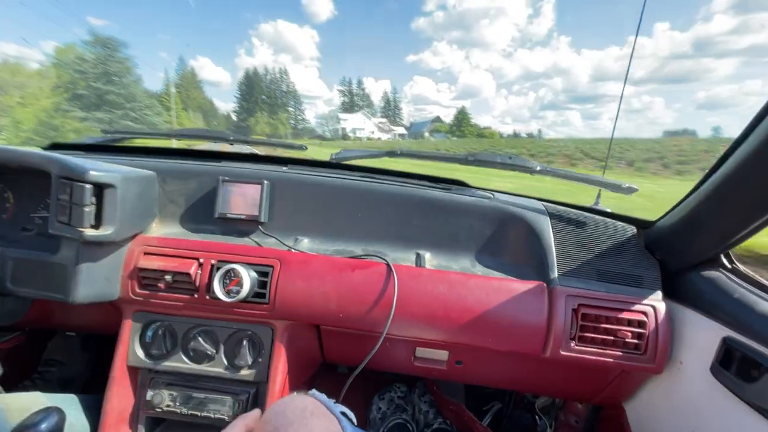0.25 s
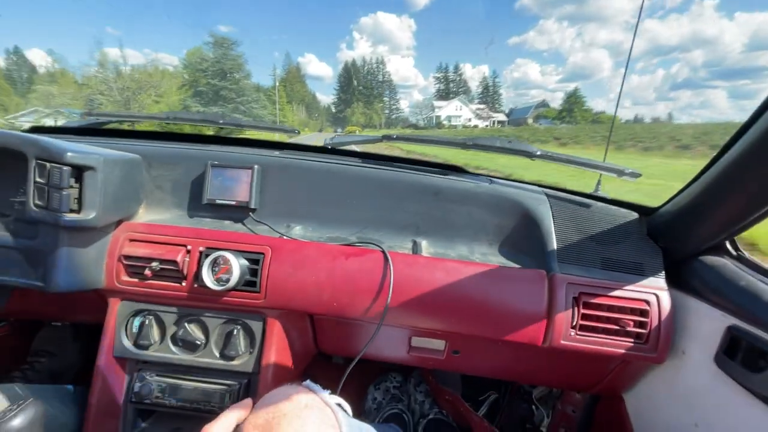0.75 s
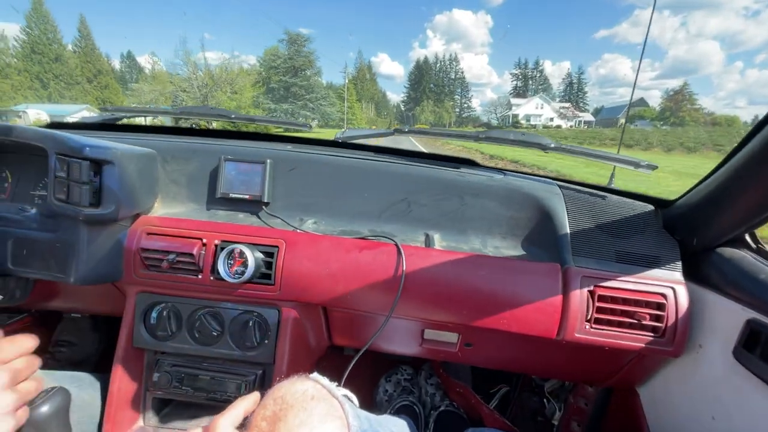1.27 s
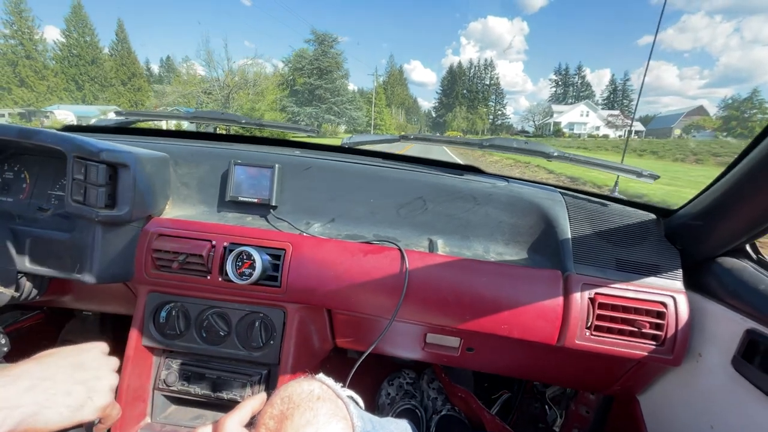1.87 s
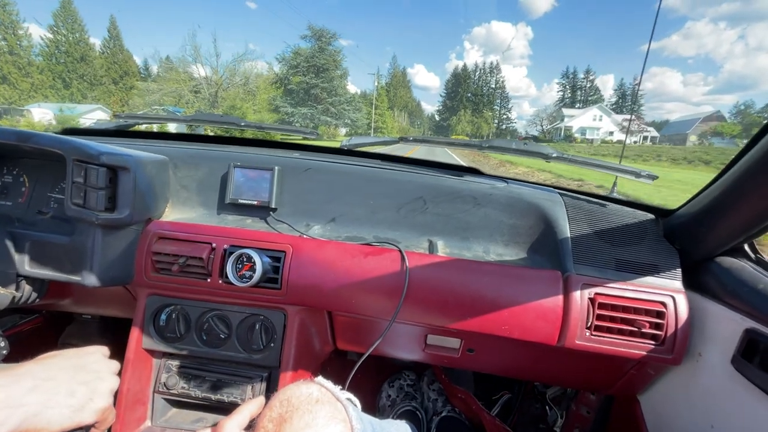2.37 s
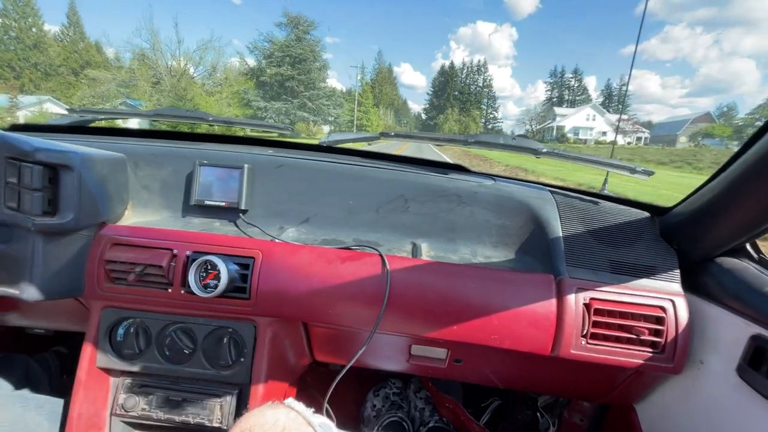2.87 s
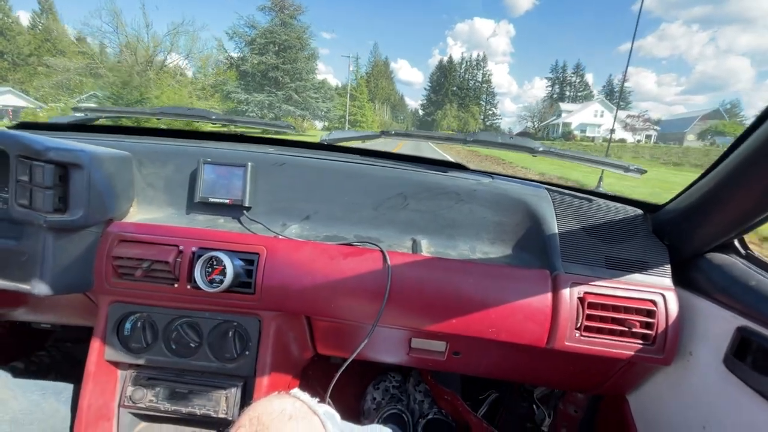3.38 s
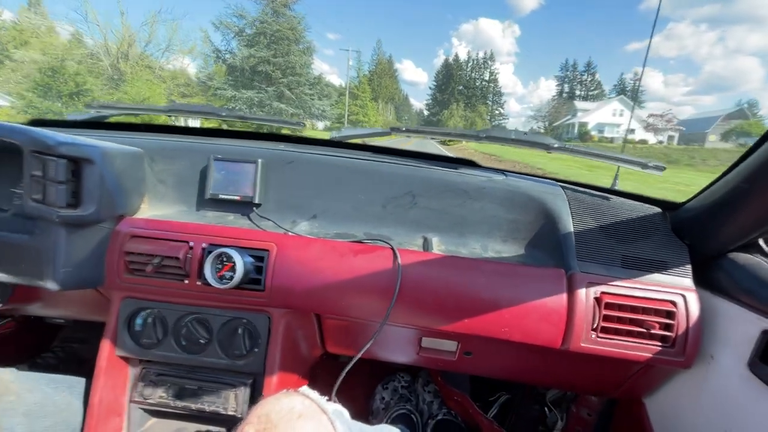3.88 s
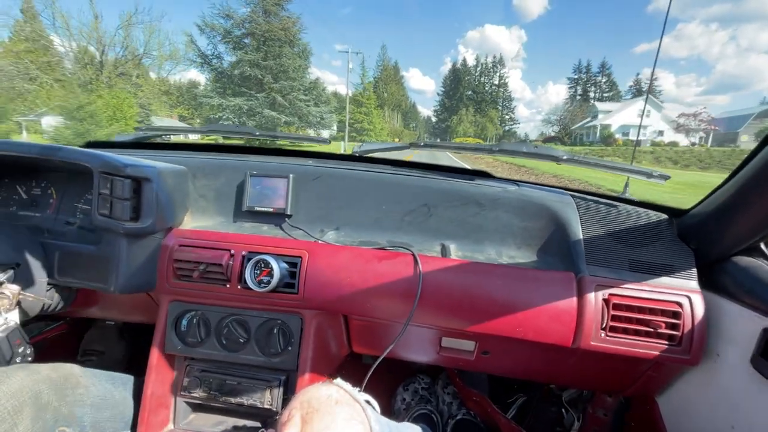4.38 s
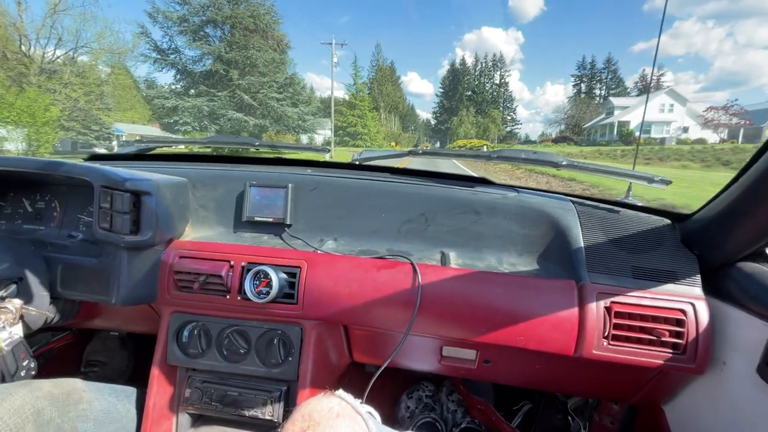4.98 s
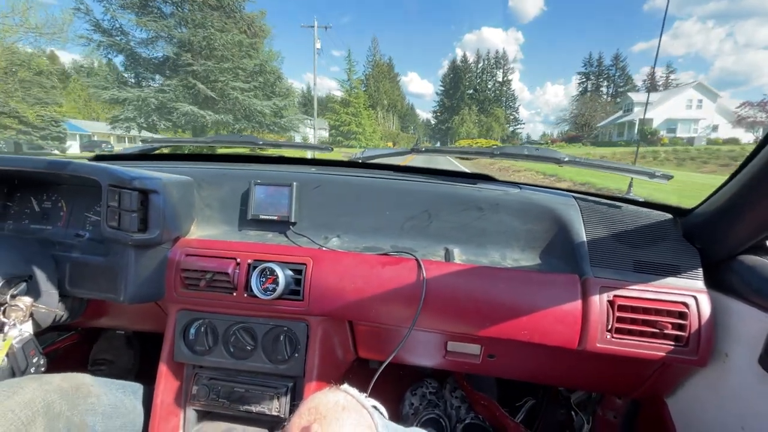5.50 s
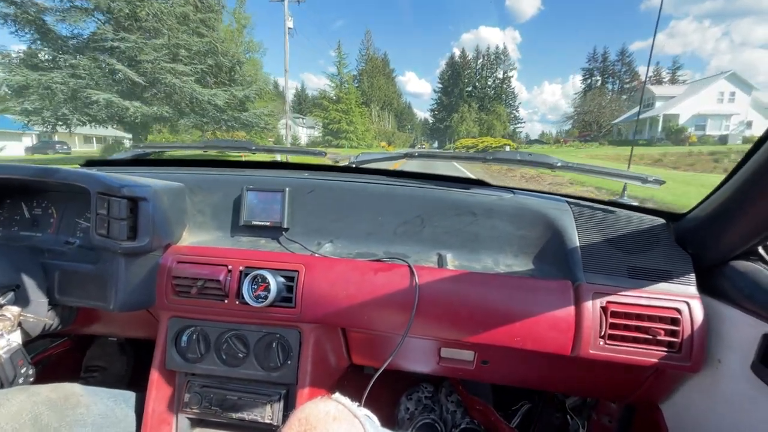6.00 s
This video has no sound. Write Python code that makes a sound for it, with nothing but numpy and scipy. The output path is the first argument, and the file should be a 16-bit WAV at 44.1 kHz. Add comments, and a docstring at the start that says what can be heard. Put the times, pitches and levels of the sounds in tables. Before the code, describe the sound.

A V8 heard from the passenger seat surges through one gear, slightly shuddering at first, with booming exhaust, breathy intake hiss and a thin supercharger whine. One small clink rings on the left near the start. After about two and a half seconds it falls back for a shift, rumbling and burbling, then drives upward again to the end, with a swell of air. Close, bassy cabin sound.

```python
"""A supercharged V8 pulls hard, changes up and pulls again, heard from the passenger seat.
The exhaust is a sum of orders of the cycle rate that sweep through the cabin booms, with burbles near the shift.
The blower whines at a fixed multiple of engine speed; shaped noise makes roar, intake rush, hiss and rumble.
A small piece of metal clinks once in the first pull, and a gust of air swells in the second."""
import sys
import numpy as np
from scipy import signal
from scipy.fft import rfft, irfft
from scipy.io import wavfile
from scipy.ndimage import uniform_filter1d, minimum_filter1d

SR = 44100
rng = np.random.default_rng(int(sys.argv[2]) if len(sys.argv) > 2 else 0)


def materialize(psi):
    """Save the field psi as 16-bit PCM at rate SR to the path in sys.argv[1].

    A 1-D psi becomes a single channel; in a 2-D psi each row is a channel.
    """
    bounded = np.clip(np.atleast_2d(psi).T, -1, 1)
    quanta = np.round(bounded * 32767).astype(np.int16)
    wavfile.write(sys.argv[1], SR, quanta)


N = 275625
TIME = np.arange(N) / SR  # s

# phase by which the left channel leads the right: frequency_hz, lead_rad
LEFT_LEAD = [(0, 0), (600, -2.6), (1290, -3.2), (1550, -0.6), (1980, -3.0), (2330, -0.7), (2930, -3.6),
             (3790, -5.8), (4480, -6.2), (5430, -10.1), (5860, -8.3), (6200, -11.9), (7060, -13.2),
             (8440, -11.2), (9730, -15.6), (10900, -16.2), (11700, -18.8), (12600, -18.9)]

# Engine speed is counted in four-stroke cycles per s: two crank turns, eight firings.
CRUISE_SPEED = 19  # reference for the levels that rise with speed, cycles per s
BLOWER_ORDER = 297.5  # whine cycles per engine cycle
# The foot lifts, the clutch bites, the throttle opens again; CLOSE_S is how long the throttle takes to shut.
LIFT_S, BITE_S, REOPEN_S, CLOSE_S = 2.576, 3.149, 3.187, 0.075


def from_db(db):
    """Amplitude ratio is ten to the power of decibels over twenty."""
    return 10 ** (np.asarray(db) / 20)


def rms_one(x):
    """Dividing by the root mean square gives unit power."""
    return x / np.sqrt(np.mean(x ** 2) + 1e-20)


def at_log(rows, position):
    """Interpolation on a logarithmic axis: each column after the first is read at the position."""
    points, *columns = np.transpose(rows)
    where = np.log(position + 1)
    return [np.interp(where, np.log(points + 1), column) for column in columns]


def drift(rate_hz):
    """Low-passed noise is a slow random fluctuation, here of spread 1."""
    step = 40  # samples between the points of the slow noise
    pole = np.exp(-2 * step * np.pi * rate_hz / SR)
    white = rng.standard_normal(N // step + 2002)
    slow = signal.lfilter([1], [1, -2 * pole, pole * pole], white)[2000:]  # start-up dropped
    return np.interp(np.arange(N) / step, np.arange(len(slow)), rms_one(slow))


def ramp(start_s, length_s):
    """Linear transition from 0 to 1."""
    return np.clip((TIME - start_s) / length_s, 0, 1)


def swell(centre_s, length_s):
    """Gaussian envelope of height 1; length_s is the half-width at 1/e."""
    return np.exp(-((TIME - centre_s) / length_s) ** 2)


def pan(tilt_db):
    """Constant-power panning: left and right gains that differ by tilt_db."""
    gains = from_db(np.array([[.5], [-.5]]) * tilt_db)
    return gains / np.sqrt(np.mean(gains ** 2, axis=0))


def stereo_tone(phase, tilt_db, lead_rad):
    """Level and phase differences place a sine of rms 1 between left and right."""
    return np.sqrt(2) * pan(tilt_db) * np.cos(phase + np.array([[.5], [-.5]]) * lead_rad)


def ring(clicks, hz, t60_s):
    """A lightly damped resonator: a unit click starts a decaying sine of height 1."""
    radius, turn = from_db(-60 / (t60_s * SR)), 2 * np.pi * hz / SR
    denominator = [1, -2 * radius * np.cos(turn), radius * radius]
    return signal.lfilter([0, np.sin(turn)], denominator, clicks + 1e-18)


def cabin_noise(colour):
    """Spectral shaping: white noise takes on a colour, with partial stereo coherence and rms 1."""
    # peaks and dips in the noise colour: frequency_hz, width_hz, level_db (added to the colour; negative is a dip)
    peaks_and_dips = [(783, 71, -5.5), (1530, 42, 6.5), (1800, 414, 9), (2730, 110, 4), (3020, 150, 7.5),
                      (4280, 17, 11), (4250, 38, 1.5), (4940, 47, 1), (5940, 600, 6.5), (8850, 580, 3.5),
                      (10480, 190, -9.5)]
    # correlation of left and right: frequency_hz, likeness (0 to 1)
    likeness = [(60, .98), (250, .8), (500, .75), (1000, .45), (2000, .55), (4500, .7), (8500, .8),
                (12000, .95)]
    # left level above right: frequency_hz, tilt_db
    tilt = [(60, 0.5), (90, -1.0), (140, 1.0), (210, -2.5), (310, -2.5), (470, 0.0), (700, -2.0),
            (1060, 0.5), (1600, 0.5), (2410, -1.0), (3630, 3.0), (5460, 4.5), (8230, -1.5), (12400, 0.5)]
    hz = np.arange(N // 2 + 1) * SR / N
    level_db = at_log(colour, hz)[0]
    for centre_hz, width_hz, change_db in peaks_and_dips:
        level_db = level_db + change_db / (1 + (2 * (hz - centre_hz) / width_hz) ** 2)
    alike = np.clip(at_log(likeness, hz)[0], 0, .99)
    mid, side = rfft(rng.standard_normal((2, N)))
    channels = np.sqrt(1 + alike) * mid + np.sqrt(1 - alike) * side * [[1], [-1]]
    lead_rad = np.interp(hz, *np.transpose(LEFT_LEAD))
    delay = np.exp(1j * lead_rad * [[.5], [-.5]])
    spectrum = channels * delay * pan(at_log(tilt, hz)[0]) * from_db(level_db)
    return rms_one(irfft(spectrum, N))


def shudder():
    """Torsional oscillation: engine speed swings while the driveline winds up and lets go."""
    # start_s, length_s, swing_hz, depth (cycles per s)
    shudders = [(0, 1.14, 2.52, .39), (3.27, .3, 3.1, .22), (3.578, .24, 2.06, .75)]
    swing = 0
    for start_s, length_s, hz, depth in shudders:
        age = np.maximum(TIME - start_s, 0)
        swing = swing + depth * np.sin(2 * np.pi * hz * age) * np.exp(-(age / length_s) ** 4)
    return swing


def engine_speed():
    """Drag flattens each pull; between them the revs fall freely, then the clutch drags them to the next gear."""
    # pull in each gear: start_s, start_speed (cycles per s), gain (cycles per s, each s)
    pulls = [(0, 14.535, 4.128), (3.626, 14.324, 2.737)]
    drag_per_s = .049  # share of the mean acceleration lost each s
    bite_speed = 15.963  # cycles per s, before the shudders
    first, second = (start_speed + gain * (TIME - start_s) * (1 - drag_per_s * (TIME - start_s))
                     for start_s, start_speed, gain in pulls)
    locked_s, locked_speed, _ = pulls[1]
    lift_speed = np.interp(LIFT_S, TIME, first)
    shift = np.interp(TIME, [LIFT_S, BITE_S, locked_s], [lift_speed, bite_speed, locked_speed])
    return np.select([TIME < LIFT_S, TIME < locked_s], [first, shift], second) + shudder()


def throttle_shut():
    """Throttling of the charge: 1 while the throttle is shut, 0 at full throttle."""
    return ramp(LIFT_S, CLOSE_S) - ramp(REOPEN_S, length_s=0.29)


def boost_lost():
    """Exponential relaxation: pressure bleeds away after the lift and builds once the throttle opens (0 to 1)."""
    fall_s, rise_s = 0.031, 0.47  # time constants
    bled = 1 - np.exp(-np.maximum(TIME - LIFT_S, 0) / fall_s)
    return bled * np.exp(-np.maximum(TIME - REOPEN_S, 0) / rise_s)


def pulsing(angle, per_turn, per_firing, ragged_db):
    """Amplitude modulation: gas noise swells with each crank turn and each firing."""
    pulses = np.exp(per_turn * np.cos(2 * angle) + per_firing * np.cos(8 * angle))
    return rms_one(pulses * from_db(ragged_db * drift(33)))


def flow_level(speed, cruise_db, rise_db, shut_db):
    """Flow noise grows with speed by rise_db per doubling and changes by shut_db without boost."""
    return from_db(cruise_db + rise_db * np.log2(speed / CRUISE_SPEED) + shut_db * boost_lost())


def body_rumble(speed):
    """Structure-borne noise grows with speed and swells as the body judders while the clutch takes up."""
    # frequency_hz, level_db (relative, per Hz)
    rumble_colour = [(15, -26), (30, -9), (50, 10), (75, 8), (100, 7.5), (140, 7.5), (220, 2), (300, -13.5),
                     (500, -51)]
    judder_db = 17.5 * swell(3.25, length_s=0.39)
    level = from_db(-28 + 20.5 * np.log2(speed / CRUISE_SPEED) + judder_db)
    return level * cabin_noise(rumble_colour)


def hiss(speed, angle):
    """Turbulent flow noise at the top of the spectrum, steeply dependent on speed."""
    # frequency_hz, level_db (relative, per Hz)
    hiss_colour = [(4000, -12.5), (6000, -3.5), (7500, -3), (8900, -0.5), (10500, 3.5), (11500, -4),
                   (12500, -24), (13500, -38)]
    level = flow_level(speed, cruise_db=-44, rise_db=19, shut_db=-11)
    return level * pulsing(angle, per_turn=.03, per_firing=.06, ragged_db=0.76) * cabin_noise(hiss_colour)


def intake_rush(speed, angle):
    """Turbulent flow noise of the intake air, pulsed by the engine."""
    # frequency_hz, level_db (relative, per Hz)
    intake_colour = [(700, -5.5), (1200, -1), (1700, -3), (2300, -3), (3200, -1), (3900, -8), (4500, -3.5),
                     (5500, -3.5), (6500, -17.5), (8000, -51)]
    level = flow_level(speed, cruise_db=-37, rise_db=12, shut_db=-8.5)
    return level * pulsing(angle, per_turn=0.031, per_firing=0.076, ragged_db=0.65) * cabin_noise(intake_colour)


def exhaust_roar(speed, angle):
    """Turbulent flow noise of the exhaust gas, pulsed by the engine."""
    # frequency_hz, level_db (relative, per Hz)
    roar_colour = [(120, -36.5), (250, 1), (400, 0), (540, -3), (700, -2), (1000, -6.5), (1250, -17.5),
                   (2000, -43)]
    level = flow_level(speed, cruise_db=-28, rise_db=10.5, shut_db=-9.5)
    return level * pulsing(angle, per_turn=0.041, per_firing=0.061, ragged_db=1.56) * cabin_noise(roar_colour)


def gust():
    """Turbulent noise under a Gaussian envelope: a rush of air swells and fades during the second pull."""
    # frequency_hz, level_db (relative, per Hz)
    gust_colour = [(900, -33), (1500, -13), (2000, -3), (2500, -3), (3200, -13.5), (4200, -20.5)]
    return from_db(-36.5) * swell(5.0, length_s=0.23) * cabin_noise(gust_colour)


def clink(start_s=0.31, hz=6654, tap_db=-29):
    """Impulse response of one damped mode: loose metal is tapped once as the car surges."""
    tap = np.zeros(N)
    tap[round(start_s * SR)] = from_db(tap_db)
    return ring(tap, hz, t60_s=.13) * pan(tilt_db=14)


def whine_db(speed):
    """Duct resonance: the whine sweeps through peaks, follows the belt's tug and sinks with the bypass open."""
    # whine on full boost as the duct passes it: frequency_hz, level_db (rms, before tug, bypass and flicker)
    whine_duct = [(4300, -52.5), (4750, -48), (5130, -47), (5480, -40.5), (5850, -49), (6200, -42.5),
                  (6700, -43), (7050, -51.5)]
    bypass_open = ramp(LIFT_S, CLOSE_S) - ramp(BITE_S, length_s=.03)
    tug_limit = 4.5  # cycles per s squared; the belt slips above this
    tug = np.clip(np.gradient(shudder()) * SR, -tug_limit, tug_limit)
    tug_db = 1.3 * uniform_filter1d(tug, size=3000)
    return at_log(whine_duct, BLOWER_ORDER * speed)[0] + tug_db - 18 * bypass_open


def blower(speed, angle, flutter=0.001, flicker_db=2.5, tilt_db=8):
    """Blade-passing tone locked to engine speed; at low revs random modulation frays it into a band."""
    lugging = np.clip((17 - speed) / 2, .05, .75)  # share of the tone's power that is frayed
    slip = (flutter + .008 * lugging) * drift(18)  # fraction of engine speed
    phase = BLOWER_ORDER * (angle + 2 * np.pi * np.cumsum(speed * slip) / SR)
    fray = np.sqrt(1 - lugging) + np.sqrt(lugging / 2) * (drift(110) + 1j * drift(110))
    lead_rad = np.interp(BLOWER_ORDER * speed, *np.transpose(LEFT_LEAD))
    level = from_db(whine_db(speed) + flicker_db * drift(36))
    return level * np.abs(fray) * stereo_tone(phase + np.angle(fray), tilt_db, lead_rad)


def burbles():
    """Transient excitation: late burns in the pipes make the cabin boom softly for a few cycles."""
    # centre_s, pitch_hz, peak_db
    bursts = [(2.655, 50, -16), (3.04, 52, -20), (3.21, 64, -15), (3.27, 68, -14), (3.335, 56, -16),
              (3.61, 54, -22)]
    return sum(from_db(peak_db) * swell(centre_s, length_s=.028) * np.cos(2 * np.pi * hz * (TIME - centre_s))
               for centre_s, hz, peak_db in bursts)


def exhaust(speed, angle, waver_hz=7, waver_growth=0.091, scatter_rad=0.296):
    """Harmonic synthesis: eight firings a cycle give the main note, unequal cylinders the other orders."""
    # exhaust lines: order (multiple of the cycle rate), level_db (before boom, load and rasp)
    orders = [(2, 9), (3, -7), (4, -7.5), (5, -10), (6, -1.5), (7, -15), (8, 5), (9, -17), (10, -8.5),
              (11, -15), (12, -19), (13, -20), (14, -24), (15, -16), (16, -15), (17, -27.5), (18, -22),
              (19, -21), (20, -23), (21, -32.5), (22, -24), (23, -36), (24, -30.5), (25, -32.5), (26, -43),
              (27, -46.5), (28, -43.5), (29, -29), (30, -24.5), (31, -28), (32, -50), (33, -36.5),
              (34, -30), (35, -54), (36, -44.5)]
    # cabin booms at the passenger seat: frequency_hz, boom_db
    cabin_booms = [(35, -47.5), (44, -27.5), (64, -16.5), (100, -19.5), (122, -12), (148, -13.5),
                   (168, -15.5), (210, 1), (250, -7), (292, -27), (330, -4.5), (380, -9.5), (420, -15),
                   (545, -2.5), (800, -44)]
    # standing waves, left against right: frequency_hz, tilt_db, lead_rad
    cabin_stereo = [(45, 0, 0), (70, 1, -.1), (100, 0, -.6), (125, -1, -.45), (148, 1, -.4), (168, 7, .4),
                    (188, -5, .7), (210, -13, -.5), (245, -8, -.5), (290, -1, -.3), (335, 1, -1.1),
                    (545, -2, -2.3)]
    # strength at full throttle: speed (cycles per s), firing_db, throb_db (of the unequal cylinders)
    torque = [(13.87, -5, -8.5), (17.65, 2.5, -5.5), (20, 2.5, 0.5), (20.73, -0.5, -1), (22.63, -2.5, -1),
              (23.4, -6, -1)]
    unsteady = 0.14  # variation from cycle to cycle, scaled by waver_growth and order
    growl_speed, align_rad = 20.0, .055  # cycles per s; rad per cycle per s
    firing_db, throb_db = at_log(torque, speed)
    shut = throttle_shut()
    firing_db, throb_db = firing_db - 10 * shut, throb_db - 15 * shut
    out = np.zeros((2, N))
    for order, level_db in orders:
        boom_db, = at_log(cabin_booms, order * speed)
        tilt_db, lead_rad = at_log(cabin_stereo, order * speed)
        if order < 5:
            load_db = 0  # shaking of the block, which goes on with the throttle shut
        elif order % 8:
            load_db = throb_db
        else:
            load_db = firing_db
        rasp_db = 6.5 * np.log2(speed / CRUISE_SPEED) if order > 12 else 0
        # combustion varies from cycle to cycle, the more so in the high orders
        waver = unsteady * waver_growth * order
        # reflections in pipes and cabin smear and scatter the orders far from the firing note
        away = abs(order - 8)
        scatter = scatter_rad * max(away - 3, 0) * rng.standard_normal()
        # rising revs draw the echoes into line, so that the throb hardens into a growl
        align = align_rad * (speed - growl_speed) * min(away, 2) ** 2
        phase = order * angle + .2 * away ** 2 - align + scatter + waver * drift(waver_hz)
        level = from_db(level_db + boom_db + load_db + rasp_db) * (1 + waver * drift(waver_hz))
        out += level * stereo_tone(phase, tilt_db, lead_rad)
    return out


def scene():
    """Superposition: the crank angle, the integral of engine speed, drives exhaust, blower and gas noise."""
    speed = engine_speed()
    angle = np.pi + 2 * np.pi * np.cumsum(speed) / SR  # rad, one turn of it per four-stroke cycle
    engine = exhaust(speed, angle) + burbles() + blower(speed, angle)
    gas = exhaust_roar(speed, angle) + intake_rush(speed, angle) + hiss(speed, angle)
    return engine + gas + body_rumble(speed) + gust() + clink()


def record(dry):
    """Gain control and band limiting: a look-ahead limiter holds the peaks, a steep low-pass cuts the top."""
    ceiling, hold = .77, round(.025 * SR)  # full scale 1; samples
    room = ceiling / np.maximum(np.abs(dry).max(axis=0), ceiling)
    gain = uniform_filter1d(minimum_filter1d(room, 2 * hold), hold)
    low_pass = signal.ellip(10, .1, 90, 12300, fs=SR, output="sos")  # ripple dB, stopband dB, cutoff Hz
    return signal.sosfilt(low_pass, dry * gain)


dry = scene()
out = record(dry)
materialize(out)
```